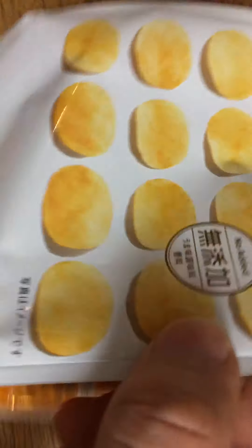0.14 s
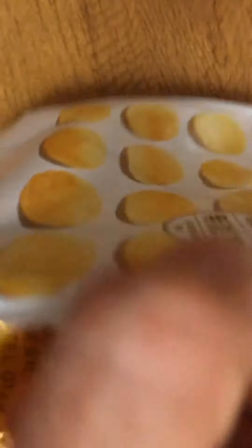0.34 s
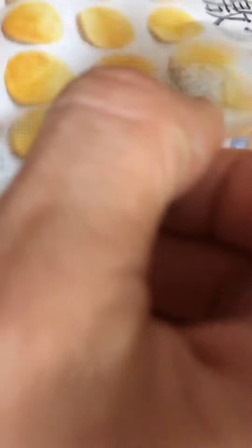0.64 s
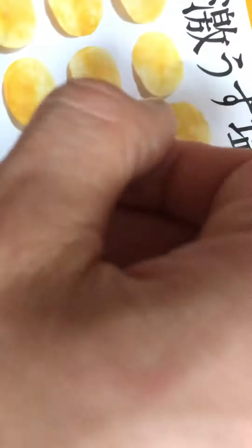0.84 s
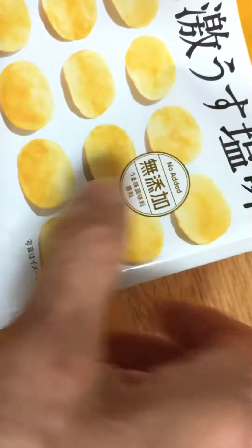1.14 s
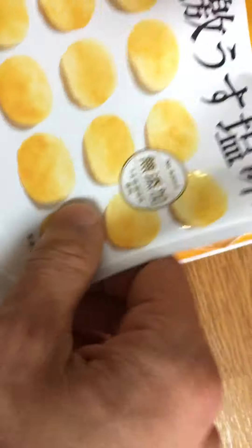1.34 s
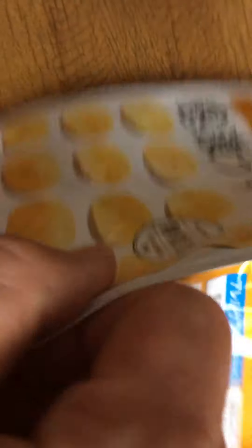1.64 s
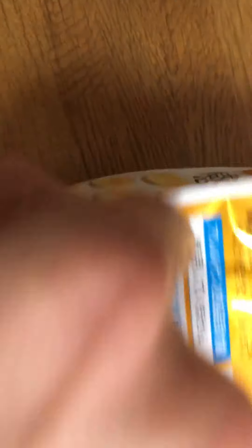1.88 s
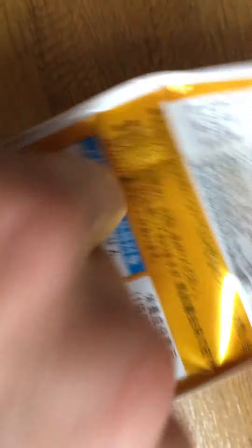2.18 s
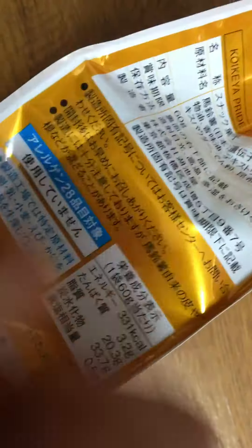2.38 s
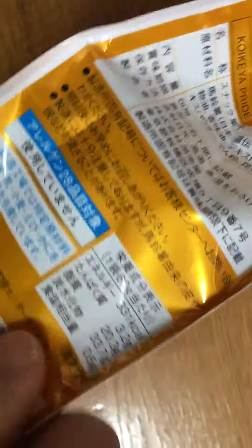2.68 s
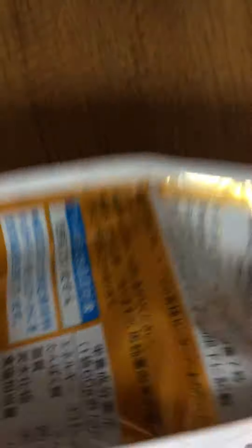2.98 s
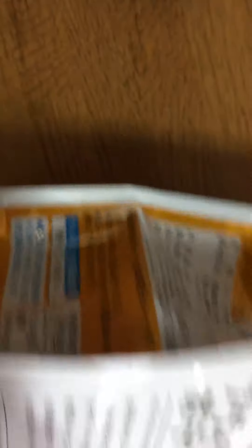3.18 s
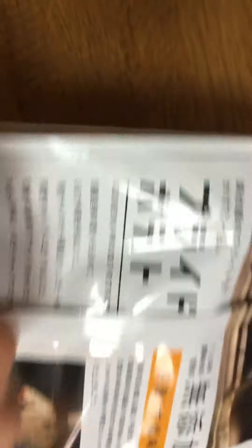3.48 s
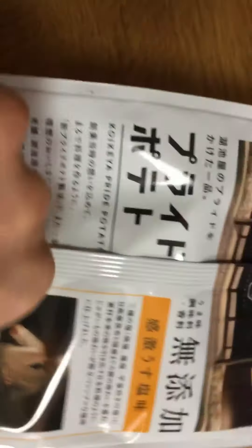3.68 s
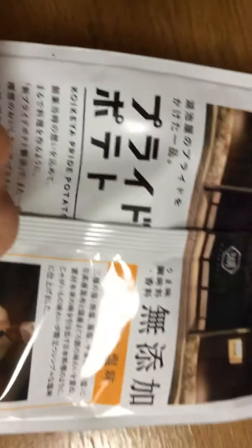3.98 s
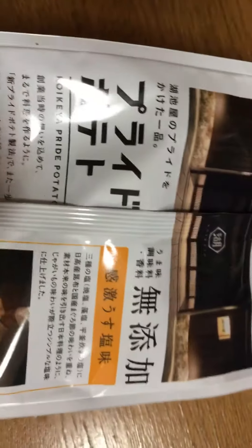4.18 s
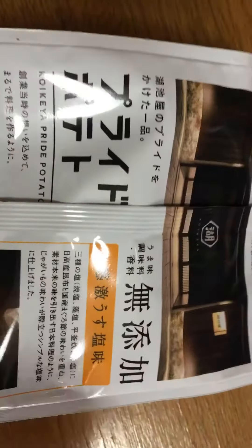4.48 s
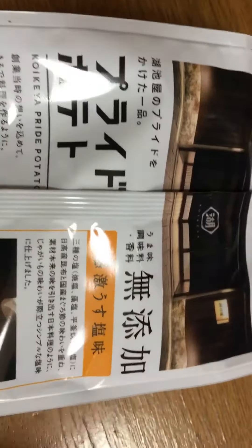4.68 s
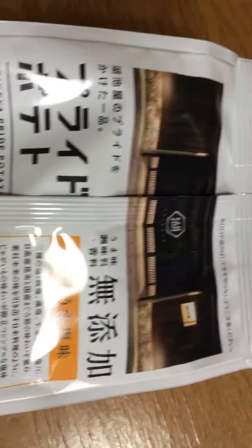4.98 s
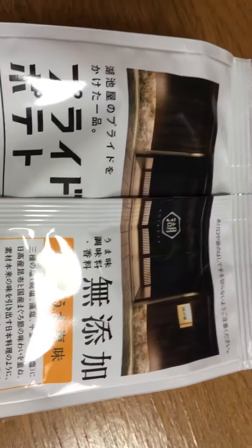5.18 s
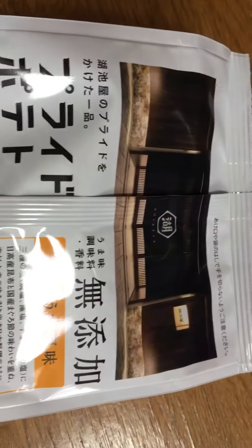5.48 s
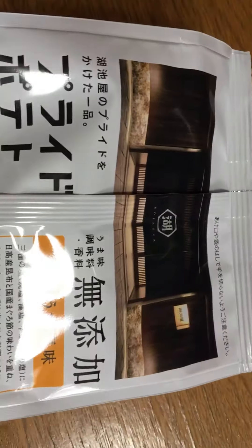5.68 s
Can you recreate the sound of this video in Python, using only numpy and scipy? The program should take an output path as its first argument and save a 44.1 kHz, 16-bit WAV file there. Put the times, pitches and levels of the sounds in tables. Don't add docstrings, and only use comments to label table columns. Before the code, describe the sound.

Loud crinkling of a plastic film bag handled on a table, with snapping creases and soft bumps over a faint low hum.

```python
import sys
import numpy as np
from scipy import signal
from scipy.fft import rfft, irfft
from scipy.io import wavfile
from scipy.ndimage import uniform_filter1d

SR = 44100
rng = np.random.default_rng(int(sys.argv[2]) if len(sys.argv) > 2 else 0)


def level_to_linear(level):
    exponent = np.asarray(level, float) / 20
    return 10 ** exponent


def to_wav(sig):
    pcm = np.clip(np.atleast_2d(sig), -1, 1) * 32767
    pcm = np.round(pcm).astype(np.int16)
    wavfile.write(sys.argv[1], SR, pcm.T)


N = 257103


def evened(x):
    return x / np.sqrt(np.mean(x ** 2) + 1e-20)


def add(mix, s, sound):
    part = mix[round(s * SR):][:len(sound)]
    part += sound[:len(part)]


def coloured(x, points):
    f, db = np.transpose(points)
    hz = np.fft.rfftfreq(len(x), 1 / SR)
    gain_db = np.interp(np.log(hz + 1), np.log(f + 1), db, -120, -120)
    return evened(irfft(rfft(x) * level_to_linear(gain_db), len(x)))


def resonate(x, hz, width):
    r = np.exp(-np.pi * width / SR)
    return signal.lfilter([1, 0, -1], [1, -2 * r * np.cos(2 * np.pi * hz / SR), r * r], x)


def wander(per_s):
    t = np.arange(0, N / SR + .02, .01)
    slow = 0
    for f in np.geomspace(.08, 1, num=20):
        slow = slow + np.sin(2 * np.pi * (f * per_s * t + rng.random())) / np.sqrt(f)
    return np.interp(np.arange(N) / SR, t, evened(slow))


def room():
    # f/Hz, level/dB per Hz
    air = [(12, -37.5), (22, -17), (40, -1.5), (110, -15), (165, -14.5), (290, -12), (500, -25),
           (700, -26.5), (1350, -27), (1900, -35), (2500, -32), (3400, -36), (5000, -36), (12000, -35.5),
           (15700, -34.5), (15800, -65)]
    # multiple of the motor speed, level/dB rms
    hum_parts = [(1, -53.5), (2, -61.5), (5, -75), (6, -78.5), (7, -78.5), (10, -80), (16, -84)]
    # f/Hz, level/dB rms
    whine_parts = [(143, -71), (283, -74.5), (565.5, -82)]
    # f/Hz, width/Hz, level/dB rms
    casing = (2600, 710, -93.5)
    motor_hz, air_db = 58.8, -62.5
    t = np.arange(N) / SR
    turns = np.cumsum(motor_hz * (1 + 0.00092 * wander(4.7))) / SR
    casing_hz, width, buzz_db = casing
    buzz_parts = [(k, buzz_db - 6.5 * ((k * motor_hz - casing_hz) / width) ** 2) for k in range(28, 60)]
    tones = np.zeros(N)
    for k, db in hum_parts + buzz_parts:
        tones += level_to_linear(db + 2 * wander(9)) * np.sin(2 * np.pi * (k * turns + rng.random()))
    for hz, db in whine_parts:
        tones += level_to_linear(db + 2 * wander(9)) * np.sin(2 * np.pi * (hz * t + rng.random()))
    return np.sqrt(2) * tones + level_to_linear(air_db) * coloured(rng.standard_normal(N), air)


def bumps():
    # centre t/s, peak level/dB, f/Hz, half length/ms
    pushes = [(0.177, -34.5, 86.05, 9.636), (0.257, -32.5, 218.8, 9.08), (0.313, -38, 149.9, 9.24),
              (0.392, -36.5, 173.3, 9.57), (0.589, -25.5, 282.6, 6.97), (0.613, -29, 79.7, 14.67),
              (0.687, -17.5, 330, 5), (0.787, -35, 124.6, 16), (1.195, -43, 118, 7.3),
              (1.262, -29, 104, 8.23), (1.319, -41, 101.3, 11.3), (1.537, -37.5, 138.2, 7.214),
              (1.56, -47.5, 102, 22.07), (1.802, -38.5, 130.1, 8.37), (1.831, -52, 112.9, 19.13),
              (1.972, -30.5, 177.6, 5.926), (2.256, -30, 203.9, 7.76), (2.592, -37.5, 199.7, 18.16),
              (2.623, -21, 92.83, 7.725), (2.715, -27, 500, 7.55), (2.882, -46.5, 240.1, 8.92),
              (2.958, -32, 208.6, 5.817), (3.032, -38.5, 111.9, 10.62), (3.088, -34.5, 87, 9.99),
              (3.138, -25.5, 102.9, 6.256), (3.19, -42, 129, 7.17), (3.218, -27, 81.47, 7.69),
              (3.389, -31, 164.7, 5.038), (3.997, -31.5, 360.6, 4.156), (4.073, -21, 620, 4.5)]
    out = np.zeros(N)
    ms = np.arange(-2000, 2000) * 1000 / SR
    for s, peak_db, hz, half_ms in pushes:
        chance = rng.standard_normal(len(ms))
        rough = evened(resonate(resonate(chance, 300, 600), 300, 600))
        push = np.sin(2 * np.pi * hz * ms / 1000 + 3 * chance[0]) + .45 * rough
        add(out, s + ms[0] / 1000, level_to_linear(peak_db - 4.0) * np.exp(-(ms / half_ms) ** 2) * push)
    return out


def hands():
    # take hold t/s, let go t/s
    grips = [
        (-0.1, 0.935),
        (1.18, 2.445),
        (2.588, 4.365),
    ]
    # strongest t/s, effort level/dB, rise/s per 20 dB,
    # fall/s per 20 dB, brightness/dB
    slides = [(0.19, -45, .21, .55, 2.5), (0.6, -50, .1, .1, -8), (0.7, -27, .012, .05, -3),
              (0.85, -59, .2, .08, 2), (1.25, -47, 0.3148, 0.988, -1.5), (1.5, -53, 0.2875, 0.1228, 8),
              (1.76, -49.5, 0.3989, 0.3225, -5), (1.99, -40.5, 0.4409, 0.0736, -2),
              (2.22, -44, 0.405, 0.32, -5), (2.7, -43, 0.0568, 0.0385, -8),
              (2.868, -38.5, 0.3705, 0.1003, -.5), (2.98, -51, 0.9077, 0.87, -2.5),
              (3.168, -32, 0.0387, 0.1827, -2.5), (3.397, -44, 0.0089, 0.4627, -4),
              (3.662, -42, 0.1869, 0.09, -3), (3.85, -56, 1.0794, 1.0346, 1.5),
              (3.927, -46, .015, .03, -.6), (4.22, -48, .6, .07, -1), (4.36, -54.5, 0.09, 2.5629, -6),
              (2.44, -60, .1, .01, 0)]
    # t/s, effort level/dB, fall/s per 20 dB, brightness/dB
    jolts = [(0.299, -19, .015, -20), (0.72, -35, 0.1219, -2), (1.288, -32, 0.16, -5),
             (1.8, -35, 0.5, -2.5), (2.59, -32, 0.0176, -8.5), (2.709, -30, 0.0844, -3),
             (3.051, -42.5, 0.0447, 1.5), (3.121, -36.5, 0.1969, 0), (3.99, -43, 0.0951, -6),
             (4.071, -23, .028, -20)]
    # start t/s, end t/s, effort level/dB, brightness/dB
    rub_times = [(0.553, 0.582, -46, -20), (0.58, 0.605, -37, -16), (0.607, 0.635, -39, 8),
                 (0.642, 0.667, -41, -5), (0.672, 0.692, -20, -1), (0.681, 0.692, -23, 7),
                 (0.696, 0.703, -22, 0), (0.915, 0.935, -58, 4), (1.775, 1.803, -33, -6),
                 (2.846, 2.892, -37, 1), (3.478, 3.492, -42, 0), (3.585, 3.732, -44, -2)]
    # t/s, level/dB, fade/s per 20 dB
    leans = [(0.2, -45.5, 0.0998), (0.62, -31, .04), (0.692, -19, .018), (1.23, -37, 0.0959),
             (1.56, -38.5, 0.04), (2.25, -34, .09), (2.625, -30, 0.065), (3.04, -42, 0.2596),
             (3.15, -36, 0.0823), (4.082, -28.5, .022), (4.36, -45, .025), (3.54, -40, .03)]
    touch_db_per_s, let_go_db_per_s, rub_edge_db_per_s = 1300.5, 600, 5000
    jolt_rise_s = 0.0045
    drag_base_db, drag_follows = -48, .8
    t = np.arange(0, N / SR + .01, .001)
    holds = [np.minimum(touch_db_per_s * (t - on), let_go_db_per_s * (off - t)) for on, off in grips]
    held_db = np.minimum(np.max(holds, axis=0), 0)

    moves = slides + [(s, db, jolt_rise_s, fall, bright_db) for s, db, fall, bright_db in jolts]
    s, db, rise, fall, bright_db = np.transpose(moves)[:, :, None]
    power = level_to_linear(db - 20 * np.maximum((s - t) / rise, (t - s) / fall)) ** 2
    on, off, rub_db, rub_bright_db = np.transpose(rub_times)[:, :, None]
    rub_edge_db = np.minimum(rub_edge_db_per_s * np.minimum(t - on, off - t), 0)
    power = np.vstack([power, level_to_linear(rub_db + rub_edge_db) ** 2])
    bright_db = np.vstack([bright_db, rub_bright_db])
    film_db = 10 * np.log10(power.sum(axis=0) + 1e-14)
    fizz_db = 10 * np.log10((power * level_to_linear(bright_db) ** 2).sum(axis=0) + 1e-14)

    lean = sum(level_to_linear(db - 20 * abs(t - s) / fade) ** 2 for s, db, fade in leans)
    drag = level_to_linear(drag_base_db + drag_follows * (film_db + 45) + held_db) ** 2
    drag_db = 10 * np.log10(drag + lean + 1e-14)
    return [np.interp(np.arange(N) / SR, t, db) for db in (film_db + held_db, fizz_db + held_db, drag_db)]


def slips(per_s, spread_db, dying_ms, steady):
    size = level_to_linear(spread_db * np.minimum(rng.exponential(1, N), 4.5)) * (rng.random(N) < per_s / SR)
    keep = np.exp(-1000 / (SR * dying_ms))
    return (signal.lfilter([1], [1, -keep], size) + steady) * rng.standard_normal(N)


def patchy(x, patch_db):
    z = signal.stft(x, nperseg=256, noverlap=192)[2]
    field = rng.standard_normal(z.shape[::-1]).T
    for _ in range(2):
        field = uniform_filter1d(field, size=6, axis=0)
        field = uniform_filter1d(field, size=20, axis=1)
    return evened(signal.istft(z * level_to_linear(patch_db * evened(field)), nperseg=256, noverlap=192)[1][:N])


def ticks(per_s):
    size = level_to_linear(2.6 * np.minimum(rng.exponential(1, N), 3.5)) * (rng.random(N) < per_s / SR)
    panels_hz = np.geomspace(700, 6000, num=8)
    panel = rng.integers(len(panels_hz), size=N)
    out = np.zeros(N)
    for k, hz in enumerate(panels_hz):
        out += resonate(resonate(size * (panel == k), hz, hz), hz, hz) / hz ** 2
    return evened(out)


def rustle():
    # f/Hz, level/dB per Hz
    film_colour = [(150, -27), (320, -7.5), (950, 5.5), (1580, 4), (1900, 4.5), (2600, 5), (4850, -3.5),
                   (6000, -9.5), (8500, -41)]
    # f/Hz, level/dB per Hz
    fizz_colour = [(2500, -18.5), (4000, -5), (6000, -0.5), (12000, -3), (15600, -3.5), (15780, -40.5)]
    # f/Hz, level/dB per Hz
    drag_colour = [(35, -31), (80, 4.5), (230, -1.5), (400, -14), (750, -22.5)]
    # centre t/s, half length/s, f/Hz, level/dB
    glides = [
        (1.481, 0.05, 9824, -50),
        (1.924, 0.1099, 5846, -48.5),
        (2.107, .04, 8983, -54),
    ]
    t = np.arange(N) / SR
    film_db, fizz_db, drag_db = hands()
    grit = patchy(slips(1200, 3.7, 1.0, 1.0), 2)
    creak = evened(resonate(grit, 1600, 200))
    film = level_to_linear(film_db - 2.6) * (coloured(grit, film_colour) + .25 * creak + 0.3 * ticks(260))
    fine_grit = patchy(slips(900, 2.8, .5, 1.2), 3.0)
    fizz = level_to_linear(fizz_db - 3.0) * coloured(0.4 * grit + fine_grit, fizz_colour)
    hiss = rng.standard_normal(N)
    sing = np.zeros(N)
    for at, half, hz, db in glides:
        tone = evened(resonate(resonate(hiss, hz, hz / 9), hz, hz / 9))
        sing += level_to_linear(db) * np.exp(-((t - at) / half) ** 4) * tone
    drag = level_to_linear(drag_db - 1.5) * coloured(hiss, drag_colour)
    return film + fizz + sing + drag


def snap(row, chance):
    # f/Hz, width/Hz, level/dB
    bag = [(675.1, 500, -8.5), (1590, 450, -4.5), (2500, 800, -4.5), (3900, 1600, -3)]
    s, ring_db, hz, crack_db, dying_ms = row
    kick, crack_ms, sharp = 1.4, .35, 2.1
    tail_db, tail_ms = -26, 12
    ms = np.arange(chance.shape[1]) * 1000 / SR
    fall = np.exp(-ms / dying_ms) + level_to_linear(tail_db) * np.exp(-ms / tail_ms)
    kick_pulse = np.sign(chance[0, 0]) * np.exp(-((ms - .15) / 0.061) ** 2)
    shiver = chance[0] * fall + kick / dying_ms * kick_pulse
    ring = resonate(shiver, hz, hz / sharp)
    body = sum(level_to_linear(db) * evened(resonate(shiver, f, width)) for f, width, db in bag)
    low = ring / abs(ring).max() + body / abs(body).max()
    low = signal.sosfilt(signal.butter(3, min(1.4 * hz + 900, 9000), fs=SR, output="sos"), low)

    def treble(x, top_hz):
        return signal.sosfilt(signal.ellip(6, 1, 60, [5000, top_hz], "bandpass", fs=SR, output="sos"), x)

    edge = treble(chance[1] * np.exp(-ms / crack_ms), 16700 if crack_db > -22 else 15650)
    crack = edge + 0.45 * treble(chance[1] * fall, 15650)
    reach_hz = np.clip(17000 * level_to_linear(0.49 * (crack_db - ring_db)), 7000, 21000)
    crack = signal.lfilter(*signal.butter(2, reach_hz, fs=SR), crack)
    return s, level_to_linear(ring_db) * low / abs(low).max() + level_to_linear(crack_db) * crack / abs(crack).max()


def lay_snaps(rows):
    out = np.zeros(N)
    for row in rows:
        add(out, *snap(row, rng.standard_normal((2, 3000))))
    return out


def small_snaps():
    # t/s, ring peak level/dB, ring f/Hz, crack peak
    # level/dB, dying time/ms
    small = [(0.261, -45, 3000, -34, 3), (0.267, -38, 3000, -31, 3), (0.3015, -17, 810, -45, 5),
             (0.3535, -40, 6500, -38, 3), (0.369, -34, 2500, -40, 2), (0.433, -45, 5000, -37, 2.5),
             (0.4464, -35, 830, -38, 4), (0.6521, -30, 3020, -42, 2), (0.7095, -21, 2500, -30, 2),
             (0.915, -55, 2000, -46, 2), (1.2125, -33, 2500, -46, 2), (1.3305, -26, 5500, -28, 2),
             (1.294, -25, 1500, -35, 2), (2.051, -31, 4800, -45, 2.5), (2.092, -27, 2300, -45, 1.5),
             (2.202, -32, 3200, -50, 1), (2.277, -33, 3000, -42, 2), (2.7327, -16, 3500, -24, 1),
             (2.7465, -50, 5000, -30, 1), (2.8095, -50, 5000, -29, 1), (2.817, -50, 5000, -31, 1),
             (2.8225, -50, 5000, -27, 1), (3.918, -36, 3000, -50, 1.5), (3.923, -28, 5500, -36, 2.5),
             (3.983, -31, 5000, -36, 2), (4.156, -34, 3490, -52, 3), (4.16, -33, 2300, -50, 4),
             (4.21, -37, 2500, -48, 6), (1.435, -33, 900, -50, 3), (1.636, -38, 2000, -55, 1.5),
             (1.659, -38, 2400, -55, 2), (1.682, -36, 1500, -55, 3), (1.732, -38, 3000, -44, 2),
             (2.294, -36, 1600, -46, 5), (2.444, -42, 1600, -46, 5), (3.02, -34, 1200, -50, 2),
             (0.074, -44, 2000, -50, 5), (0.132, -44, 2500, -48, 5), (2.93, -45, 5500, -44, 1.5),
             (3.282, -50, 5000, -40, 1.5), (3.337, -36, 2000, -50, 4), (3.375, -40, 3000, -55, 1.5),
             (3.681, -50, 5000, -38, 1.5), (3.777, -55, 5000, -44, 1.5), (4.692, -62, 3300, -70, 12),
             (5.68, -59, 4000, -66, 12), (5.815, -57, 2100, -66, 10)]
    return lay_snaps(small)


def snaps():
    # t/s, ring peak level/dB, ring f/Hz of the panel, crack peak level/dB
    first_turn = [(0.2381, -25, 750.4, -38.5), (0.297, -9.5, 3193, -3.5), (0.359, -30.5, 4460, -34),
                  (0.3785, -18, 1590, -24), (0.3935, -41, 2280, -28.5), (0.4119, -38, 3230, -30),
                  (0.5513, -32, 3820, -27), (0.8712, -57.5, 1030, -39)]
    second_turn = [(1.1754, -43.5, 1510, -42), (1.1902, -22.5, 930, -30), (1.197, -30, 1680, -44),
                   (1.2633, -19.5, 1210, -23.5), (1.285, -11, 2595, -5.5), (1.2985, -19, 3900, -11),
                   (1.3206, -14, 1658, -7.5), (1.4209, -35, 2430, -39.5), (1.4507, -23, 1624, -36.5),
                   (1.5355, -19, 2645, -23.5), (1.5726, -19.5, 1524, -51.5), (1.6167, -40, 1550, -45.5),
                   (1.688, -28, 1352, -37), (1.7042, -21, 1514, -21.5), (1.787, -16, 1590, -30),
                   (2.0118, -23, 1790, -28), (2.0334, -24.5, 1519, -35), (2.0756, -13, 2450, -40.5),
                   (2.101, -11, 1590, -15), (2.1218, -28, 1510, -42), (2.1615, -14.5, 2971, -28),
                   (2.1896, -32, 1250, -32.5), (2.2653, -25, 1359, -36.5), (2.3841, -35.5, 1590, -46)]
    third_turn = [(2.5667, -28.5, 1550, -37), (2.5871, -4, 2900, -3), (2.6044, -17.5, 1590, -13.5),
                  (2.6135, -20.5, 1029, -26.5), (2.6203, -19, 1638, -45.5), (2.6438, -12.5, 2762, -18),
                  (2.717, -9, 1590, -9), (2.7229, -15.5, 2610, -20.5), (2.7302, -15.5, 4110, -17),
                  (2.7527, -23, 5975, -3.5), (2.7812, -35, 3285, -22), (2.9461, -39, 1060, -30),
                  (2.792, -23, 5990, -12), (2.84, -22, 3380, -20.5), (2.8553, -27.5, 2521, -23.5),
                  (2.8749, -19.5, 1590, -38.5), (2.9522, -15, 715.2, -30.5), (2.9796, -36.5, 1379, -42),
                  (3.001, -24, 1408, -51.5), (3.0239, -18, 2160, -28), (3.0489, -4, 5620, -0.6),
                  (3.0847, -19.5, 1869, -19), (3.1364, -18, 1590, -23.5), (3.1531, -22, 971, -25),
                  (3.174, -7.5, 5695, -10), (3.3238, -32, 1609, -28), (3.3594, -35, 3703, -41),
                  (3.3863, -20.5, 2957, -37.5), (3.406, -27.5, 1553, -28.5)]
    smoothing = [(3.4313, -33, 5500, -34), (3.479, -30.5, 2324, -30.5), (3.6529, -24, 2563, -45.5),
                 (3.7907, -33.5, 1590, -51), (3.8735, -38, 2132, -34), (3.882, -26.5, 2550, -20.5),
                 (3.9026, -44.5, 3420, -30), (3.9335, -25.5, 2405, -31.5), (3.987, -22.5, 2409, -21.5),
                 (3.996, -20, 1040, -36), (4.0138, -27, 1150, -34), (4.0302, -13.5, 2568, -15),
                 (4.0495, -28, 2300, -38), (4.0693, -4.5, 2500, -3), (4.0924, -17, 1656, -22),
                 (4.14, -33.5, 3000, -37.5), (4.165, -32.5, 2604, -41), (3.8004, -36, 892, -50.5),
                 (4.251, -30.5, 2890, -32.5), (4.3224, -41.5, 2687, -42.5), (4.364, -31.5, 1140, -42.5)]
    scrunches = [(0.1963, -28, 1264, -39), (0.248, -22, 1573, -34.5), (0.3384, -32, 5784, -32),
                 (0.612, -27, 1658, -23), (0.699, -19, 2887, -15), (0.8093, -36, 3528, -34.5),
                 (0.8315, -37, 2100, -32), (1.2194, -25, 729.8, -36), (1.2319, -18.5, 4694, -27),
                 (1.4935, -32, 2500, -28), (1.8916, -21.5, 1590, -29.5), (1.9703, -23, 2357, -35.5),
                 (1.99, -25, 1448, -32.5), (2.2235, -25, 1613, -31.5), (2.249, -24.5, 2600, -37.5),
                 (2.3233, -30, 2006, -27), (2.7092, -17, 1632, -16), (2.765, -21, 2196, -28.5),
                 (2.86, -24, 2453, -23), (2.8844, -28, 2051, -28.5), (3.1195, -28.5, 3940, -33.5),
                 (3.198, -22.5, 1530, -24.5), (3.2354, -21, 3218, -30), (3.5742, -48.5, 3810, -31.5),
                 (3.6219, -36, 1398, -36), (3.6945, -34.5, 1246, -24), (4.189, -30, 2240, -35),
                 (4.352, -40, 3359, -41)]
    # t/s, ring peak level/dB, ring f/Hz, crack peak level/dB, dying time/ms
    settling = [
        (4.69, -58, 1100, -64, 17),
        (5.678, -54, 909.7, -58, 17),
        (5.805, -52, 1276, -60, 15.5),
    ]
    flip_ms, quicker_per_db, scrunch_ms = 2.1177, 0.2148, 5.0
    rows = []
    for s, ring_db, hz, crack_db in first_turn + second_turn + third_turn + smoothing:
        dying_ms = flip_ms * level_to_linear(-quicker_per_db * (max(ring_db, crack_db) + 20))
        rows.append((s, ring_db, hz, crack_db, dying_ms))
    rows += [(*row, scrunch_ms) for row in scrunches]
    return lay_snaps(rows + settling)


def scene():
    return (room() + bumps() + rustle() + small_snaps() + snaps())[None]


def band_limit(x):
    return signal.sosfilt(signal.butter(12, 16980, fs=SR, output="sos"), x)


def record(dry):
    # f/Hz, width/Hz, level/dB
    port_dips = [(4913.6, 940, -3), (7750, 880, -3), (10321, 350, -4.5)]
    hz = np.fft.rfftfreq(N, 1 / SR)
    port_db = sum(db * np.exp(-((hz - f) / width) ** 2) for f, width, db in port_dips)
    top_cut = 1 / (1 + (hz / 16800) ** 120)
    heard = irfft(rfft(dry) * level_to_linear(port_db) * top_cut, N)
    return band_limit(np.clip(heard, -1, 1))


dry = scene()
out = record(dry)
to_wav(out)
```